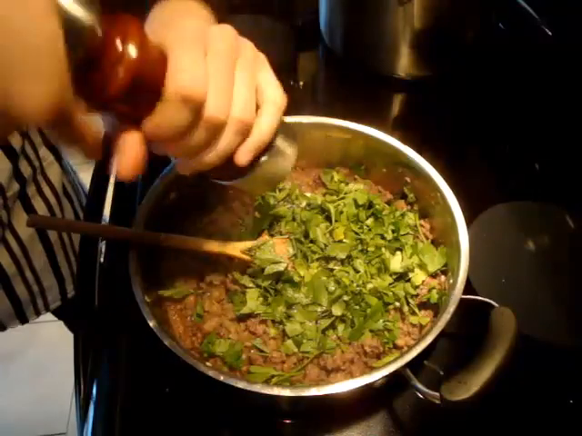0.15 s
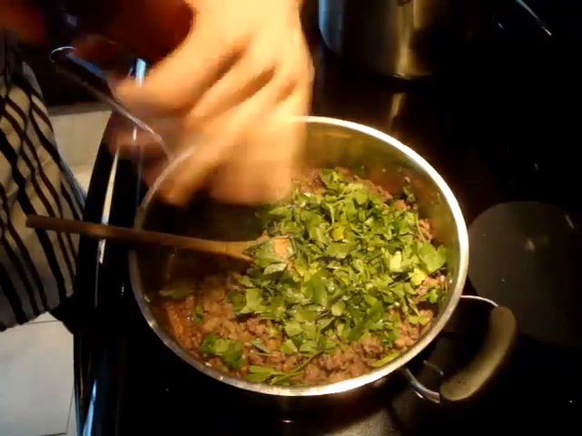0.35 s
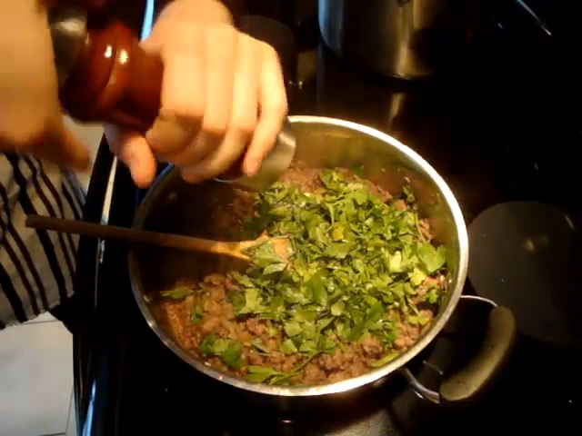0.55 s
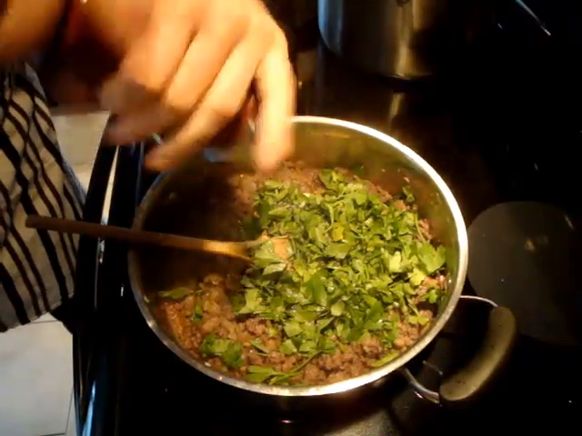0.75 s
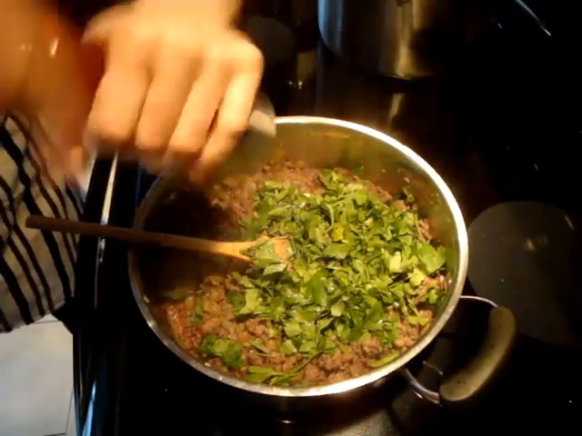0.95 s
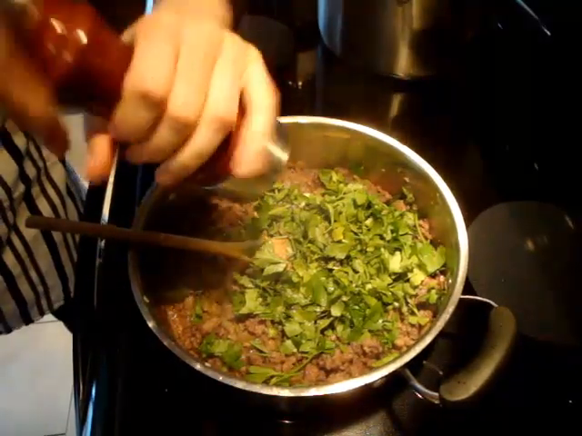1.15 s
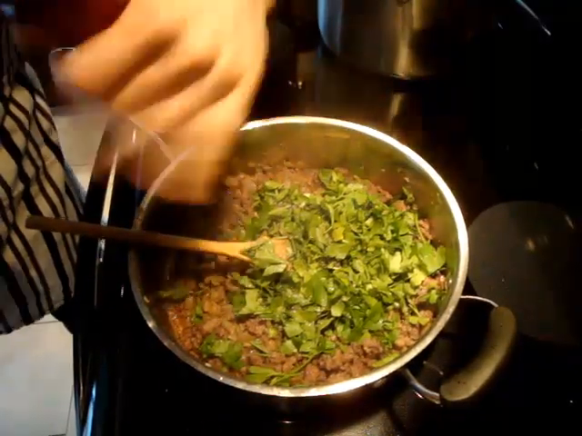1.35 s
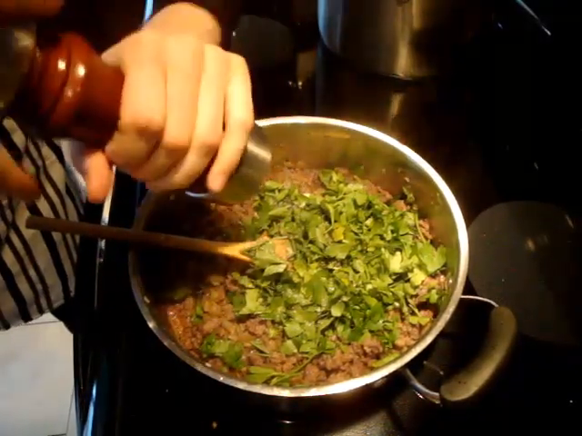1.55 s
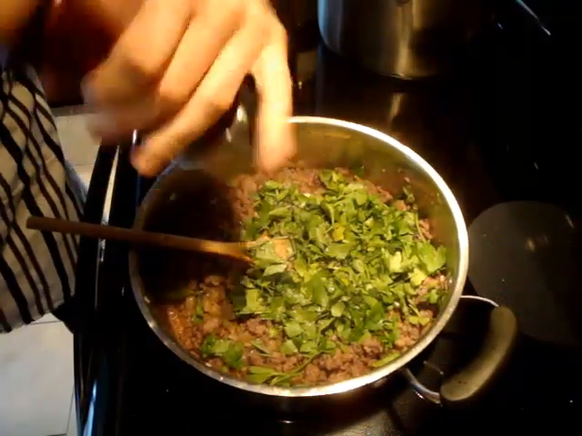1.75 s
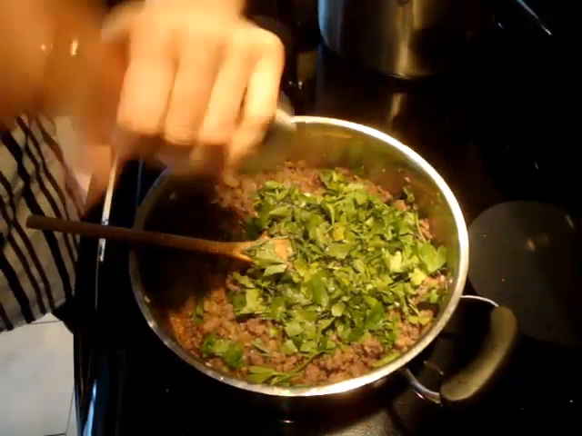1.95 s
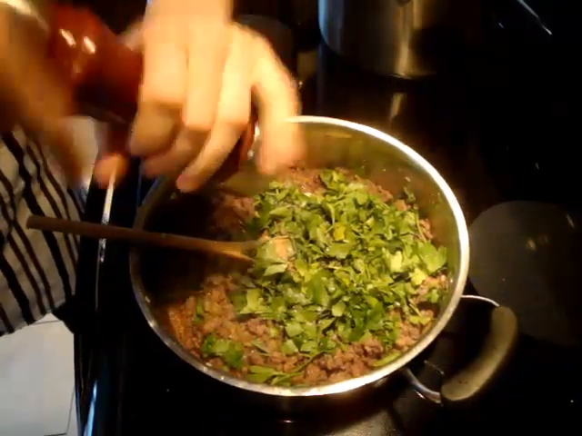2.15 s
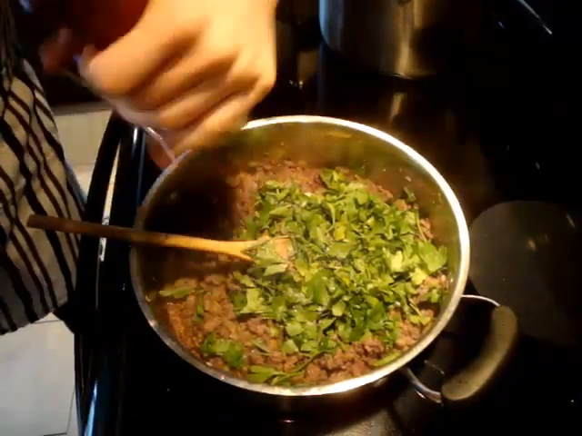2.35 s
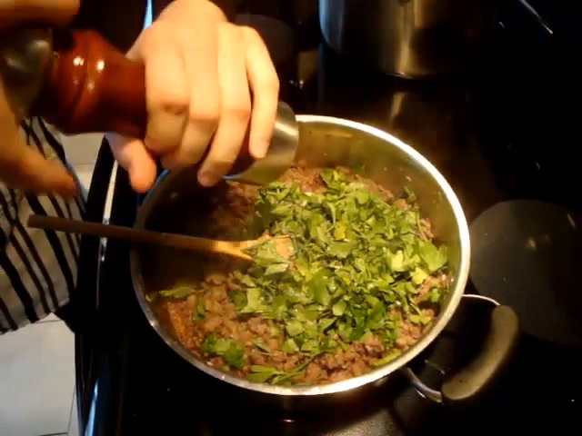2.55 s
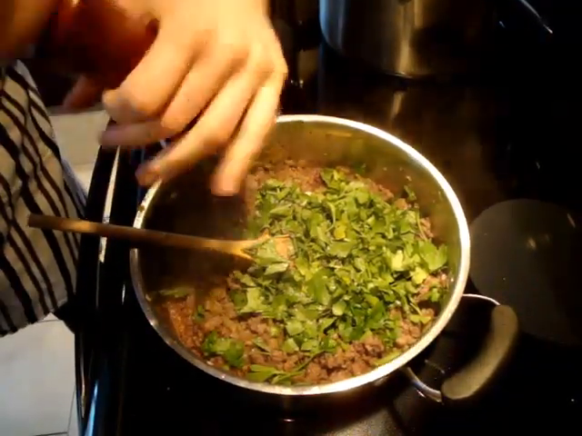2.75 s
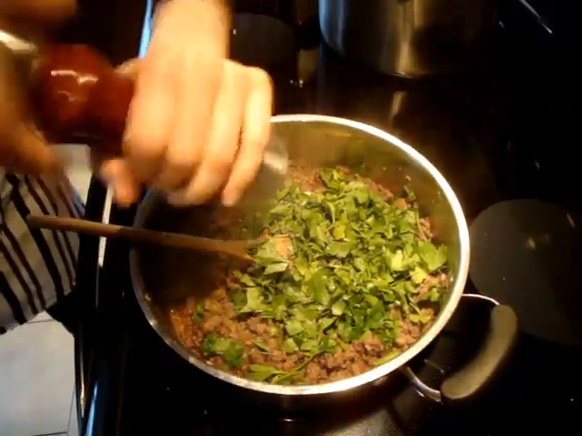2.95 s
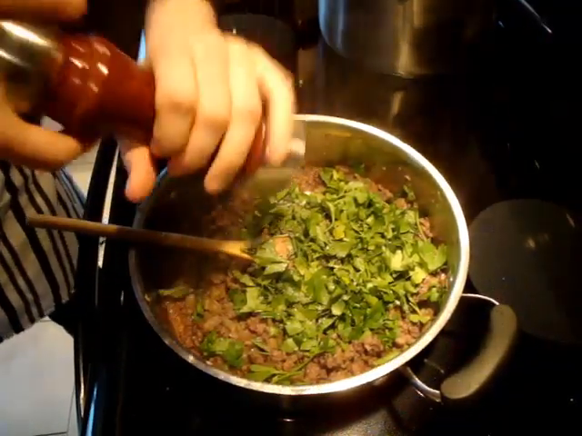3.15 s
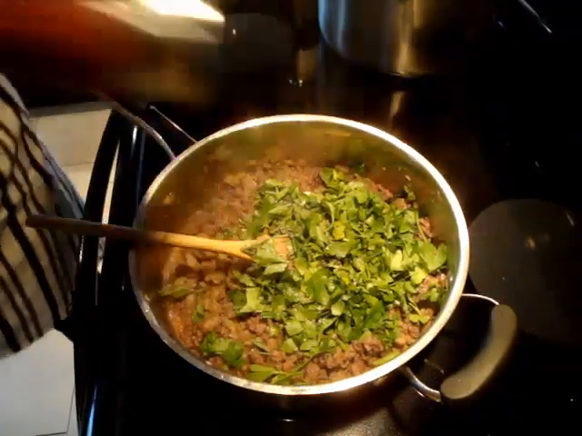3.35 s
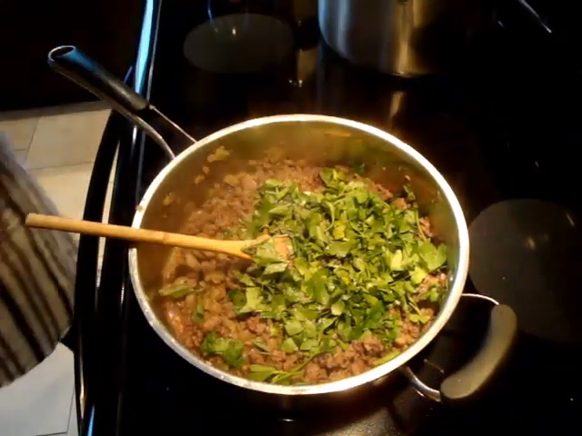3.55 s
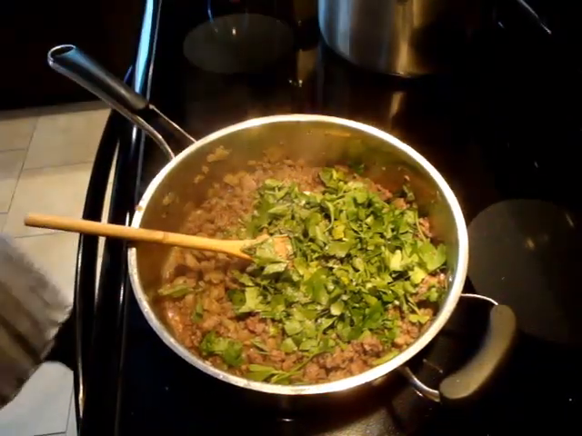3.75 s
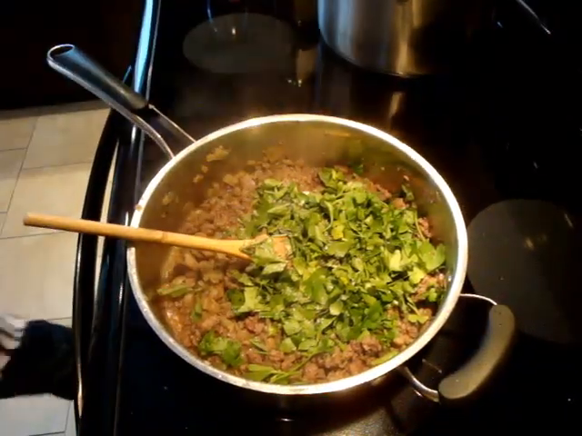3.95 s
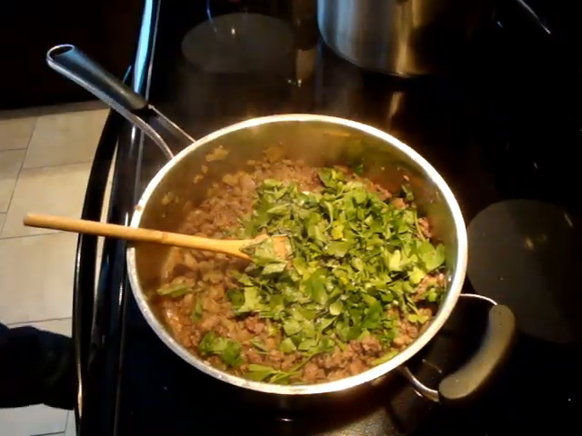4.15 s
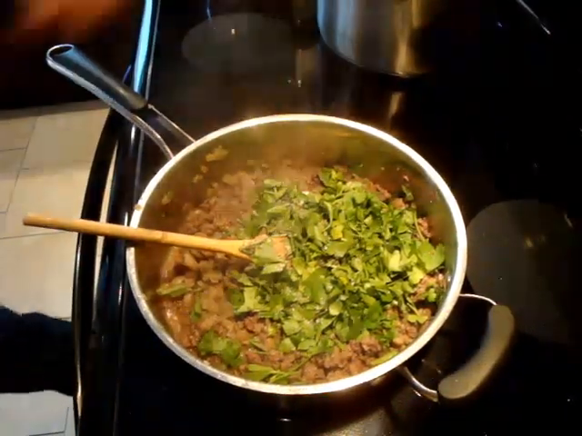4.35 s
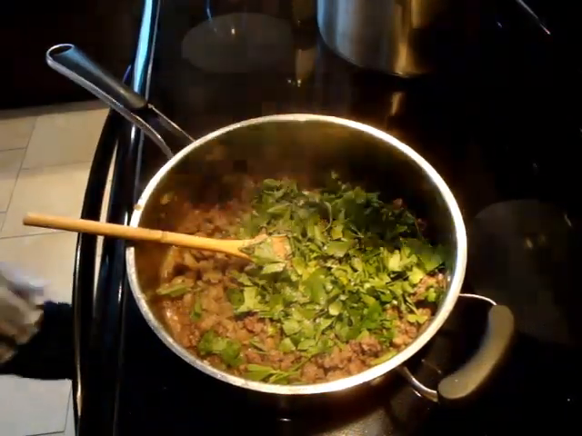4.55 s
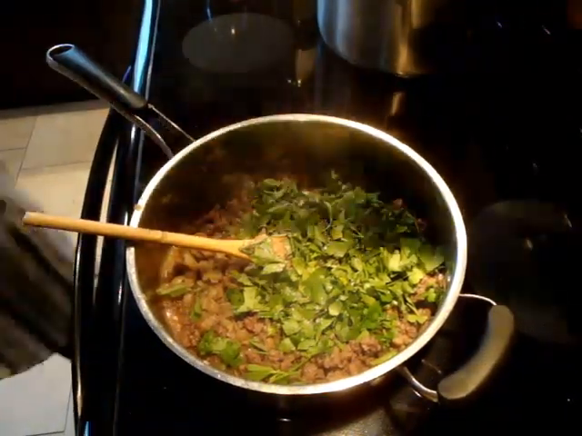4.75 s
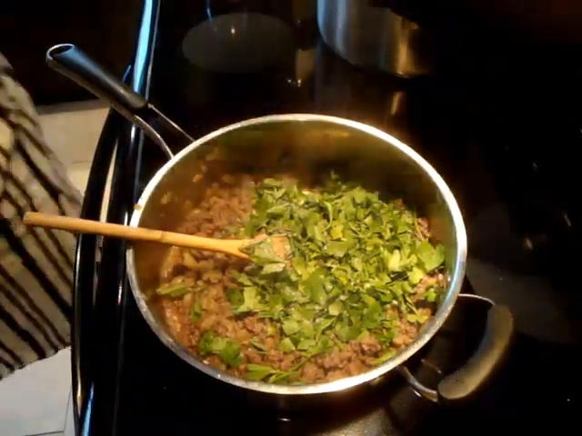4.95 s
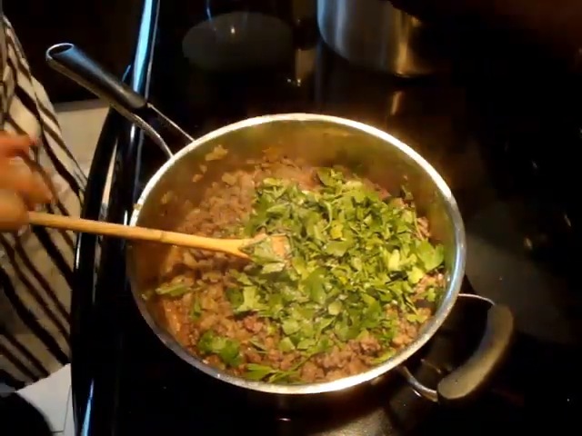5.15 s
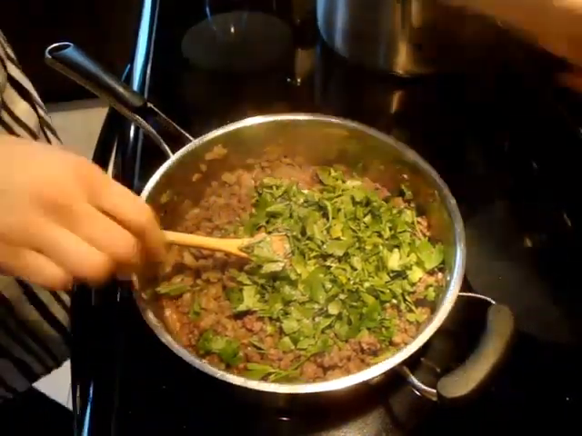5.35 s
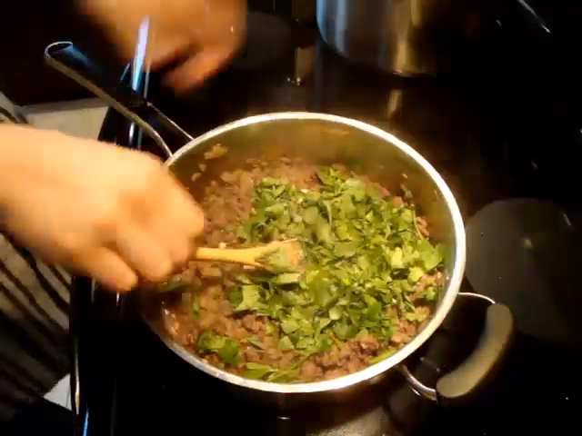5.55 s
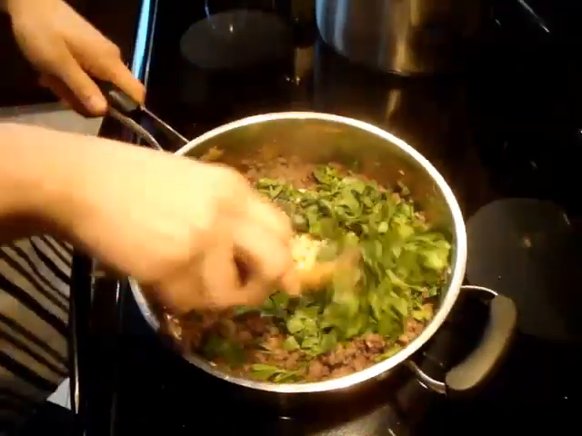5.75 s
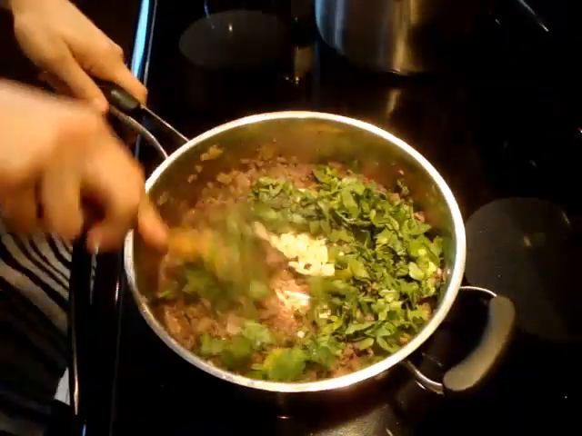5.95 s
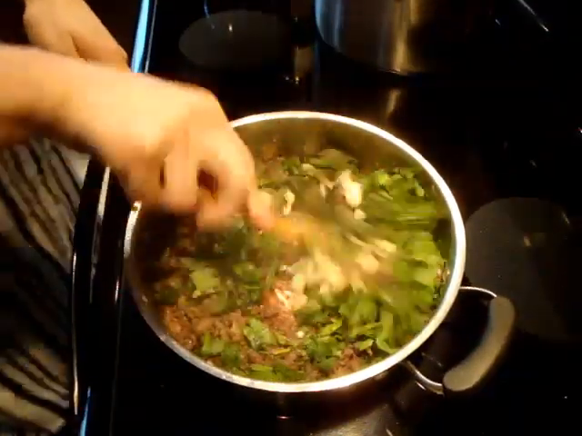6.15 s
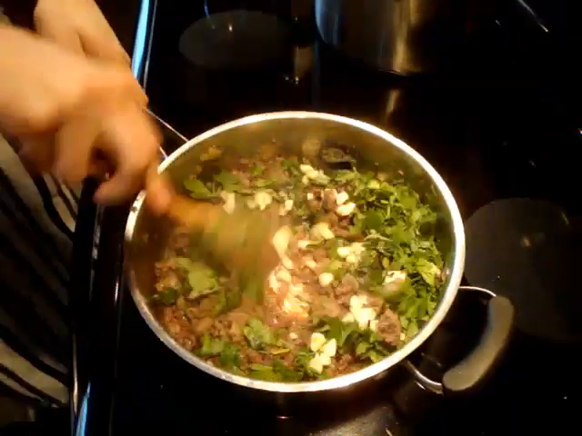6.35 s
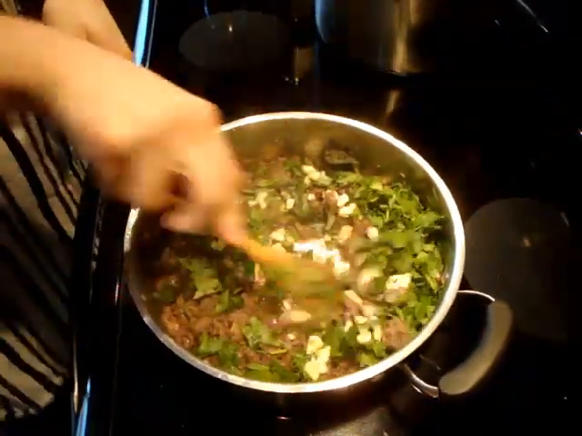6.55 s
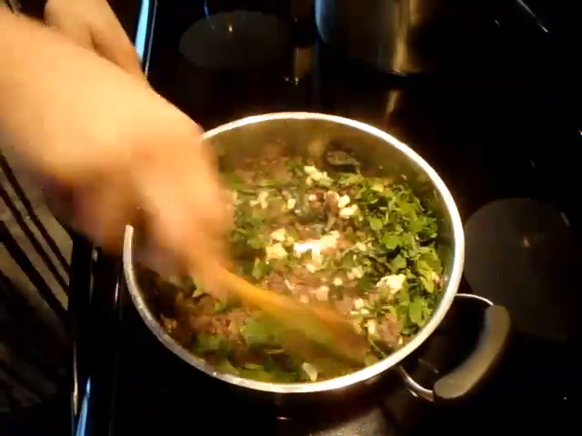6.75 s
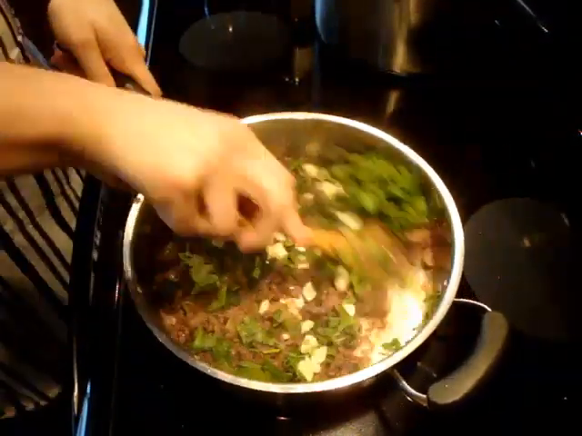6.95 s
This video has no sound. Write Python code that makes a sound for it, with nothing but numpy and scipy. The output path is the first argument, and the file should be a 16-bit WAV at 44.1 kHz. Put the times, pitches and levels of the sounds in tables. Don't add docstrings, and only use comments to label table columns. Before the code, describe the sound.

Close by in a small kitchen, a pepper mill crunches in six short twists about half a second apart, with sharp cracks and small clicks between. Meat and herbs sizzle steadily throughout. The mill is put away with a few knocks, one hard and bright, then a wooden spoon scrapes and thumps through the steel pan. One near microphone, dry, thin in the bass.

```python
import sys
import numpy as np
from scipy import signal
from scipy.fft import rfft, irfft, next_fast_len
from scipy.io import wavfile
from scipy.ndimage import uniform_filter1d, minimum_filter1d, map_coordinates

SR = 44100
rng = np.random.default_rng(int(sys.argv[2]) if len(sys.argv) > 2 else 0)


def boost_factor(decibels):
    exponent = np.asarray(decibels, float) / 20
    return 10 ** exponent


def int16_out(signal):
    q = np.round(np.clip(np.atleast_2d(signal).T, -1, 1) * 32767)
    wavfile.write(sys.argv[1], SR, q.astype(np.int16))


N = 312669

# f/Hz, reverberation time T60/s
KITCHEN_T60 = [(200, 0.27), (2000, 0.3), (10000, 0.26)]
# t/s, level/dB
DRONE_LEVEL = [
    (0, -94),
    (4.1, -87),
    (4.7, -78),
    (5.1, -73.5),
    (5.37, -75.5),
    (5.65, -71),
    (6.4, -75.5),
    (6.75, -75),
    (7.09, -81),
]
# t/s, level/dB
FRYING = [
    (0.0, -43),
    (1.68, -43),
    (2.05, -44),
    (2.76, -43),
    (3.75, -42.5),
    (4.31, -42.5),
    (5.19, -42),
    (6.08, -41.5),
    (7.09, -42.5),
]
# f/Hz, level/dB per Hz
SIZZLE_SPECTRUM = [(18, -68), (30, -36.5), (408, -17), (496, -18), (574, -10), (981, -13), (1110, -1),
                   (1250, -11.5), (1350, -7), (1520, -9.5), (2190, -6.5), (7990, -8.5), (10200, -12),
                   (13300, -69), (22000, -120)]
# f/Hz, width/Hz, level/dB
PAN = [(3750, 790, 17.5), (570, 82, 1.5), (5510, 230, 17.5), (1110, 33, 21)]
# t of the peak/s, scrape level/dB, rise/s, fall/s, drag over the scrape/dB
RUBS = [(3.795, -33, 0.051, 0.1, -7), (4.086, -50.5, 0.023, 0.14, 15), (4.33, -49.5, .15, 0.31, 1),
        (4.79, -37.5, 0.15, 0.084, -2.5), (5.228, -41, .012, 0.027, -4), (5.705, -35.5, 0.066, 0.077, -7.5),
        (5.745, -46.5, 0.067, 0.043, -5), (5.94, -36, .06, 0.39, -12), (5.85, -39.5, 0.94, 0.4, -8.5),
        (6.186, -42, 0.23, 0.085, -4), (6.3, -32.5, 0.043, 0.24, -11.5), (6.67, -34, 0.024, 0.038, -17),
        (6.78, -34.5, 0.13, 0.35, -6), (7.07, -43, 0.34, .3, -16)]
# f/Hz, width/Hz, level/dB
SCRAPE = [(1510, 510, -6), (2240, 360, 1.5), (2900, 480, 2.5), (3830, 1120, 3), (4650, 1770, -0.5),
          (6360, 1100, -4.5)]
# f/Hz, width/Hz, level/dB
DRAG = [(250, 53, -8.5), (420, 34, -3.5), (576, 77, -2.5), (793, 63, -0.5), (1210, 150, -4.5)]
# t/s, peak level/dB, f/Hz, T60/s
KNOCKS = [(6.76, -28, 1660, 0.5), (2.9676, -23.5, 1290, 0.062), (3.49, -49, 304, 0.074),
          (3.788, -36.5, 716, 0.14), (3.829, -35, 1010, 0.11), (4.076, -25.5, 1030, 0.4),
          (4.076, -35, 605, 0.36), (4.078, -32, 1300, 0.16), (4.11, -39, 283, 0.063),
          (4.2, -35, 1050, 0.19), (4.305, -42, 267, 0.23), (4.349, -40.5, 560, 0.24),
          (4.752, -30.5, 540, 0.064), (4.782, -28, 1250, .07), (4.783, -13.5, 3000, 0.061),
          (4.784, -23, 4430, .045), (4.794, -34.5, 410, 0.32),  (5.224, -33.5, 245, 0.092),
          (5.575, -38, 250, 0.18), (5.699, -22.5, 2160, 0.059), (5.735, -28.5, 590, 0.12),
          (5.934, -28.5, 1210, 0.23), (5.964, -38, 236, .079), (6.172, -29, 570, 0.055),
          (6.178, -38, 250, .11), (6.649, -29.5, 232, 0.056), (6.658, -34, 420, .2),
          (6.71, -32, 1130, 0.14), (6.753, -34, 620, .15), (6.812, -41, 245, 0.15)]
# t/s, peak level/dB
TICKS = [
    (3.789, -30),
    (4.753, -33),
    (5.227, -26),
    (5.7006, -20),
    (5.936, -28),
    (6.288, -25),
    (6.301, -23),
    (6.753, -31),
    (6.79, -30),
]
# t of the grip/s, rise/s, hold/s, crunch level/dB, collar over the crunch/dB
STROKES = [
    (0.292, 0.019, 0.066, -24.5, -1),
    (0.763, .03, 0.081, -25, 2.5),
    (1.267, 0.037, 0.075, -24, -1.5),
    (1.742, 0.068, .058, -23.5, -2.5),
    (2.245, 0.039, 0.081, -27, -3.5),
    (2.738, 0.047, 0.048, -26.5, -0.5),
]
GRIT_OVER_CRUNCH = [3, 5, 1.8, 1, 4.5, 1]
# t/s, peak level/dB, body/dB, collar/dB
SNAPS = [(0.3016, -14, -19, -24), (.3177, -18, -22, -2), (0.3328, -9, -15, -15), (0.3368, -11, -7.5, -14),
         (.757, -18.5, -12, -5), (.7808, -14, -22, -9), (.7911, -31, -20, -7), (.8104, -23, 3, 13),
         (.82, -19, 4, 7), (.8444, -25, -1, 0), (.8674, -20.5, -2.5, 16.5), (1.2741, -18.5, -8, -16),
         (1.3019, -19, -20, -1), (1.33, -10.5, -14, -18), (1.3586, -23, -12, -4), (1.3775, -30, -12, -12),
         (1.7704, -24, -13, -10), (1.7785, -19, -18, 12), (1.794, -20, -3, -1), (1.8102, -9.5, -28, 0),
         (1.8314, -16, -28, -12), (1.8509, -17.5, -28, 7.5), (2.2644, -18.5, -16, -20),
         (2.276, -19, -22, -9), (2.2914, -25, -2, 1), (2.3236, -13, -9, -0.5), (2.3501, -28, -23, -17),
         (2.7585, -19.5, -17, -3), (2.7833, -25, 1, -2)]
# t/s, peak level/dB, collar/dB
BANGS = [
    (.3128, -11, -12),
    (.3147, -10.5, -8),
    (1.0357, -9, -12),
    (1.3183, -15, 4),
    (1.8208, -8, -6),
    (1.8535, -10.5, -6),
    (2.3512, -12, 0),
    (2.7772, -9, 3),
]
# t/s, peak level/dB, body/dB, grit/dB, T60/s
REGRIPS = [(.0014, -22, -8, -22, 0.017), (0.0479, -16.5, -13, 3.5, 0.038), (0.1151, -16.5, -11, -29, 0.028),
           (0.9962, -23, -7.5, -8, 0.074), (1.033, -13, -5.5, -2, 0.039), (1.5043, -23.5, -3.5, -15, 0.039),
           (1.5216, -18.5, -4.5, -9, .03), (1.545, -25, -14, -6, 0.045), (1.9795, -25, -7.5, -11, 0.027),
           (2.151, -29, -25, -4, 0.043), (2.5107, -15.5, -7.5, -1.5, 0.048),
           (2.7092, -23.5, -10.5, -13, 0.039), (2.9682, -29.5, 2.5, -22, 0.03)]
# f/Hz, width/Hz, level/dB
BODY = [(560, 137, -3), (633, 38.4, 2), (774, 170, -7)]
# f/Hz, width/Hz, level/dB
CRUNCH = [(1077, 226, -3), (1430, 390, 3.5), (1873, 344, 5), (2220, 284, 4), (2930, 680, -1)]
# f/Hz, width/Hz, level/dB
COLLAR = [(3440, 280, -3), (3647, 250, 5.5), (3750, 1200, -17.5)]
# f/Hz, width/Hz, level/dB
GRIT = [(4860, 1860, -2.5), (5670, 590, 5), (6180, 550, 1.5), (7780, 1160, -4), (9000, 1460, -10)]
MILL_PARTS = [CRUNCH, BODY, COLLAR, GRIT]

GRIP_DB, SAG_DB, LET_GO_STEEPNESS = -16.5, -6, 475
GRIT_LAG_S, GRIT_EDGE_S, GRIT_SAG_DB = 0.022, 0.006, -6.5
BODY_DB = -10
SNAP_GRIT_DB, SNAP_T60_S = -3, 0.035
REGRIP_COLLAR_DB = -7.5
BANG_BODY_DB, BANG_GRIT_DB, BANG_T60_S = -18, -8, 0.007
RUB_FADE_DB = -21.5
KNOCK_WIDTH_HZ, WIDENS, CLICK_DB = 210, 0.7, -15
TICK_T60_S = 0.02
GAP_REACH_S, GAP_CONTRAST_DB, GAP_HZ = 0.017, 6.5, 5200
TOP_HZ = 10010


def unit(x):
    return x / np.sqrt(np.mean(x ** 2) + 1e-20)


def along(points, hz):
    f, v = np.transpose(points)
    return np.interp(np.log(hz + 1), np.log(f + 1), v)


def curve(rows):
    s, value = np.transpose(rows)
    return np.interp(np.arange(N) / SR, s, value)


def wobble(rate):
    knots = rng.standard_normal(int(N * rate / SR) + 4)
    return map_coordinates(knots, [np.arange(N) * rate / SR])


def filtered(x, response):
    m = next_fast_len(len(x) + 8192)
    return irfft(rfft(x, m) * response(np.fft.rfftfreq(m, 1 / SR)), m)[:len(x)]


def ringing(x, modes):
    def response(f):
        h = 0
        for k, (centre, width, db) in enumerate(modes):
            damping = 1j * f * width
            h = h + (-1) ** k * boost_factor(db) * damping / (centre * centre - f * f + damping)
        return h / np.sqrt(np.mean(np.abs(h) ** 2))
    return filtered(x, response)


def grains(rate, spread_db, bed):
    hit = rng.random(N) < rate / SR
    size = np.minimum(rng.exponential(size=N), 3.5)
    signs, hiss = rng.standard_normal((2, N))
    impulses = hit * np.sign(signs) * boost_factor(spread_db * size)
    return unit(unit(impulses) + bed * hiss)


def kitchen(x):
    hz, t, z = signal.stft(rng.standard_normal(SR // 2), SR, nperseg=256)
    decay = boost_factor(-60 * t / along(KITCHEN_T60, hz)[:, None])
    tail = signal.istft(z * decay, SR, nperseg=256)[1]
    delayed = np.pad(x, (200, 0))
    return signal.fftconvolve(delayed, tail / np.linalg.norm(tail))[:N]


def drone():
    hum = ringing(rng.standard_normal(N), [(117.3, 24, 1.0), (245, 32, -0.5)])
    hum = ringing(hum, [(118, 33, -7.5), (245, 40, -13)])
    return boost_factor(curve(DRONE_LEVEL) + 12.5 + 1.5 * np.tanh(wobble(22))) * unit(hum)


def sizzle():
    pops = grains(3500, spread_db=3.5, bed=0.97)
    z = signal.stft(pops, nperseg=256)[2]
    field = uniform_filter1d(uniform_filter1d(rng.standard_normal(z.shape), 5, 0), 12, 1)
    pops = signal.istft(z * boost_factor(1.3 * unit(field)), nperseg=256)[1][:N]
    with_pan = pops + 0.13 * ringing(pops, PAN)
    fizz = unit(filtered(with_pan, lambda hz: boost_factor(along(SIZZLE_SPECTRUM, hz))))
    return boost_factor(curve(FRYING) + 3.5 + 0.49 * wobble(25)) * fizz


def spoon():
    now = np.arange(N) / SR
    rubs = []
    for s, db, rise, fall, _ in RUBS:
        distance = np.maximum((s - now) / rise, (now - s) / fall)
        rubs.append(boost_factor(db + np.maximum(RUB_FADE_DB * distance, -120)))
    scrape = sum(rubs)
    drag = boost_factor([row[-1] for row in RUBS]) @ rubs
    rub = unit(boost_factor(0.9 * np.tanh(wobble(40))) * grains(1800, spread_db=2.0, bed=0.41))
    scraping = ringing(boost_factor(-3.5) * scrape * rub, SCRAPE)
    return scraping + ringing(boost_factor(-2.5 + 0.5 * wobble(30)) * drag * rub, DRAG)


def knocks():
    out, t = np.zeros(N + SR), np.arange(SR // 4) / SR
    for s, db, hz, t60 in KNOCKS:
        fade = boost_factor(-60 * t / t60) * (1 - np.exp(-t / 0.00076))
        modes = [(hz, KNOCK_WIDTH_HZ * (hz / 1000) ** WIDENS, 0), (2.3 * hz, 300, -20)]
        blow = fade * rng.standard_normal(len(t))
        blow[round(0.001 * SR)] = 9.3
        low = ringing(ringing(blow, modes), [(hz, 1.5 * hz, 0)])
        click = ringing(fade ** 2 * rng.standard_normal(len(t)), SCRAPE)
        knock = low / np.abs(low).max() + boost_factor(CLICK_DB) * click / np.abs(click).max()
        out[round(s * SR):][:len(t)] += boost_factor(db - 3.0) * knock
    for s, db in TICKS:
        burst = boost_factor(-60 * t / TICK_T60_S) * rng.standard_normal(len(t))
        burst[0] = -9.5
        tick = ringing(burst, SCRAPE + GRIT)
        out[round(s * SR):][:len(t)] += boost_factor(db) * tick / np.abs(tick).max()
    return out[:N]


def flurries():
    dying = boost_factor(-60 * np.arange(SR // 20) / SR / 0.046)
    triggers = np.abs(grains(230, spread_db=1.5, bed=0))
    return 0.65 + unit(signal.fftconvolve(triggers, dying)[:N])


def grinding():
    now, efforts, bites = np.arange(N) / SR, [], []
    for s, rise, hold, *_ in STROKES:
        top, end = s + rise, s + rise + hold
        effort_db = [-90, GRIP_DB, 0, SAG_DB, SAG_DB - 0.19 * LET_GO_STEEPNESS]
        efforts.append(boost_factor(np.interp(now, [s - 0.01, s, top, end, end + 0.24], effort_db)))
        bite_s = s + np.cumsum([GRIT_LAG_S, GRIT_EDGE_S, rise + hold - GRIT_LAG_S, GRIT_EDGE_S])
        bites.append(boost_factor(np.interp(now, bite_s, [-60, 0, GRIT_SAG_DB, -60])))
    peaks, collars = boost_factor(np.transpose(STROKES)[-2:])
    crunch = peaks @ efforts
    collar = (peaks * collars) @ efforts
    grit = (peaks * boost_factor(GRIT_OVER_CRUNCH)) @ bites
    common = flurries() * grains(1500, spread_db=3.5, bed=0.35)
    out = np.zeros(N)
    for gain, modes in zip([crunch, boost_factor(BODY_DB) * crunch, collar, boost_factor(-3) * grit], MILL_PARTS):
        own = flurries() * grains(1700, spread_db=3.5, bed=0.35)
        cracks = 0.7 * common + own
        out += ringing(boost_factor(-1.0) * gain * unit(cracks), modes)
    return out


def breaks():
    events = [(s, db, body, collar, SNAP_GRIT_DB, SNAP_T60_S) for s, db, body, collar in SNAPS]
    events += [(s, db, body, REGRIP_COLLAR_DB, grit, t60) for s, db, body, grit, t60 in REGRIPS]
    events += [(s, db, BANG_BODY_DB, collar, BANG_GRIT_DB, BANG_T60_S) for s, db, collar in BANGS]
    out, t = np.zeros(N), np.arange(SR // 16) / SR
    for s, db, body_db, collar_db, grit_db, t60 in events:
        burst = boost_factor(-60 * t / t60) * np.tanh(2.2 * rng.standard_normal(len(t)))
        burst[0] = -3.5
        start = round(s * SR)
        for part_db, modes in zip([0, body_db, collar_db, grit_db], MILL_PARTS):
            ring = ringing(burst, modes)
            out[start:start + len(t)] += boost_factor(db + part_db - 4.0) * ring / np.abs(ring).max()
    return out


def mill():
    return filtered(grinding() + breaks(), lambda hz: 1j * hz / (1j * hz + 220))


def scene():
    near = mill() + knocks() + spoon()
    mono = near + boost_factor(-12.5) * kitchen(near) + sizzle() + drone()
    return np.array([mono, mono])


def treble_gaps(x):
    hz, t, z = signal.stft(x, SR, nperseg=256, noverlap=192)
    band, block = np.arange(len(hz))[:, None] // 3, np.arange(len(t)) // 8
    dice = rng.random((len(hz), len(t)))[band, block]
    treble = hz > GAP_HZ
    power = np.sum(np.abs(z[treble]) ** 2, axis=0)
    level_db = 10 * np.log10(uniform_filter1d(power, size=5) + 1e-12)
    loudest_near_db = -minimum_filter1d(-level_db, size=round(2 * GAP_REACH_S / t[1]))
    beside_db = loudest_near_db - level_db
    odds = 0.035 * np.clip((hz[:, None] - 4500) / 1500, 0, 1) * np.ones(len(t))
    odds[treble] += np.clip((beside_db - GAP_CONTRAST_DB) / 4, 0, 0.62)
    odds[treble] += 0.1 * (level_db > np.median(level_db) + 6)
    return signal.istft(z * np.where(dice < odds, 0.03, 1), SR, nperseg=256, noverlap=192)[1][:N]


def low_pass(x):
    return signal.sosfilt(signal.butter(12, 11190, fs=SR, output="sos"), x)


def record(dry):
    mic = filtered(dry[0], lambda hz: (1j * hz / (1j * hz + 150)) ** 2)
    bent = 0.0095 * np.tanh(4.2 * mic) ** 2
    thuds = filtered(bent, lambda hz: 1j * hz / (1j * hz + 40) / (1 + 1j * hz / 200))
    low_noise = filtered(rng.standard_normal(N), lambda hz: (hz > 8) / (1 + (hz / 110) ** 2))
    murmur = boost_factor(-83.0) * unit(low_noise)
    gapped = treble_gaps(mic + thuds + murmur)
    limited = filtered(gapped, lambda hz: 1 / (1 + (hz / TOP_HZ) ** 480) ** 0.5)
    return low_pass(np.array([limited, limited]))


dry = scene()
out = record(dry)
int16_out(out)
```